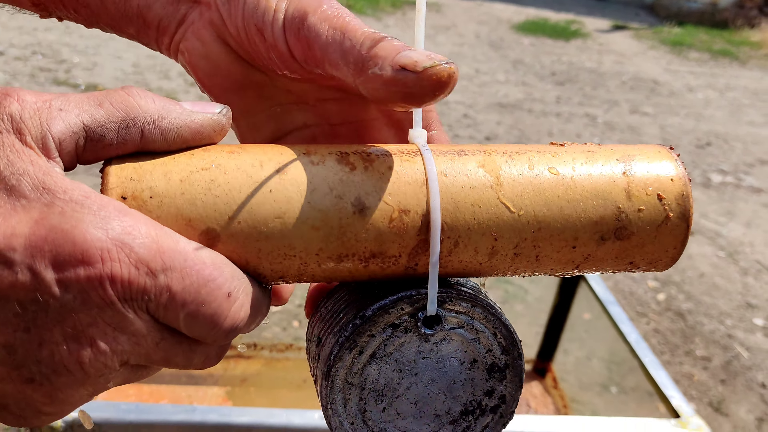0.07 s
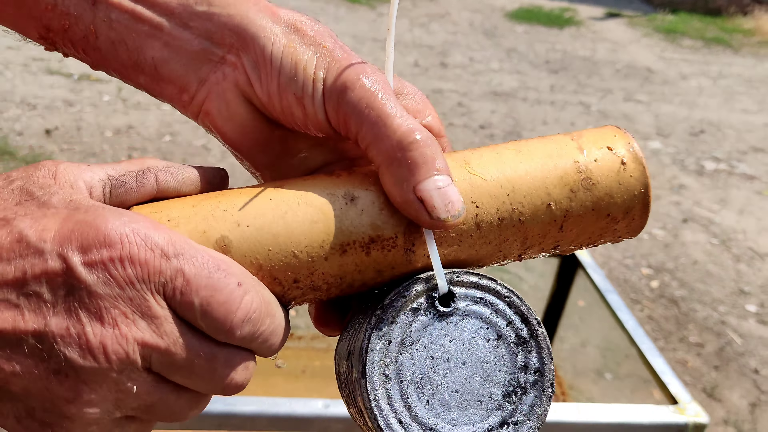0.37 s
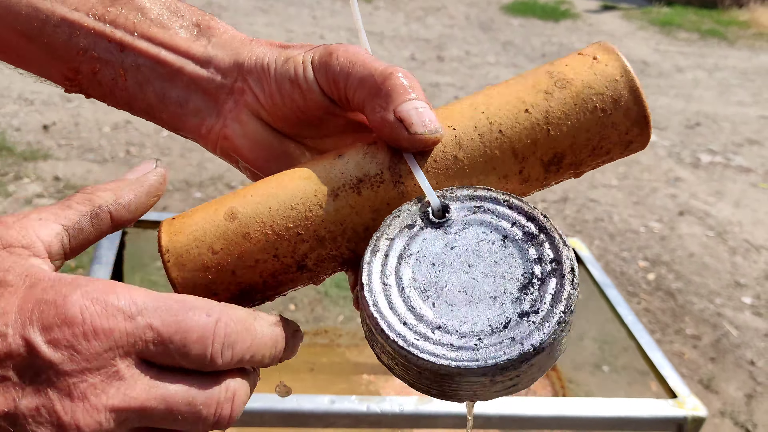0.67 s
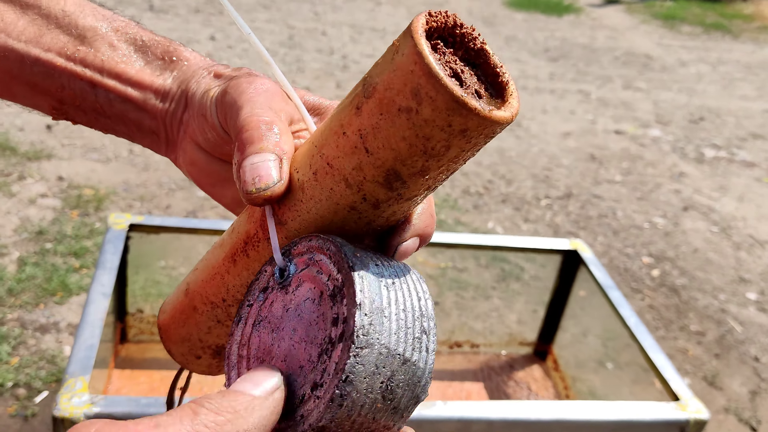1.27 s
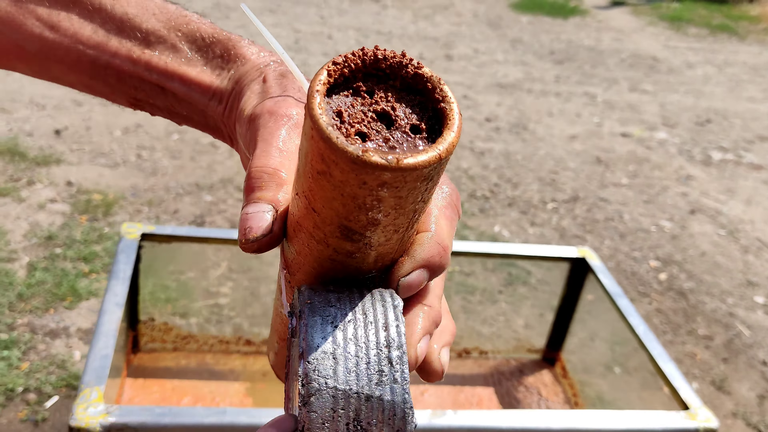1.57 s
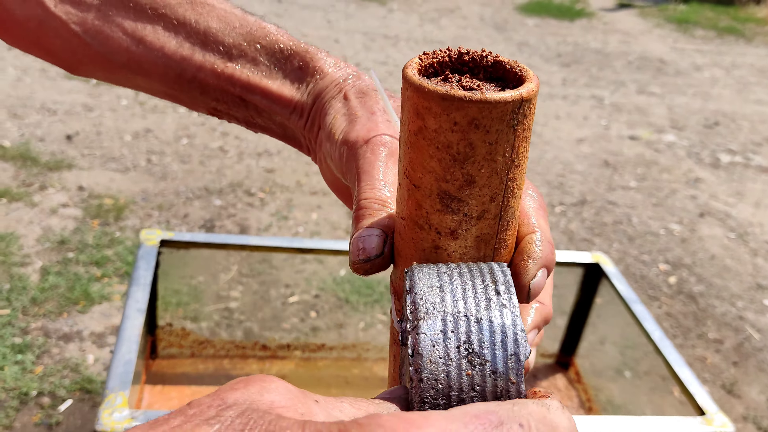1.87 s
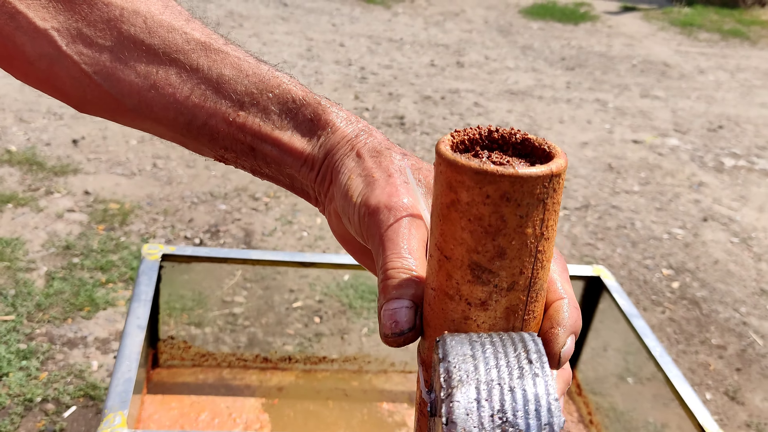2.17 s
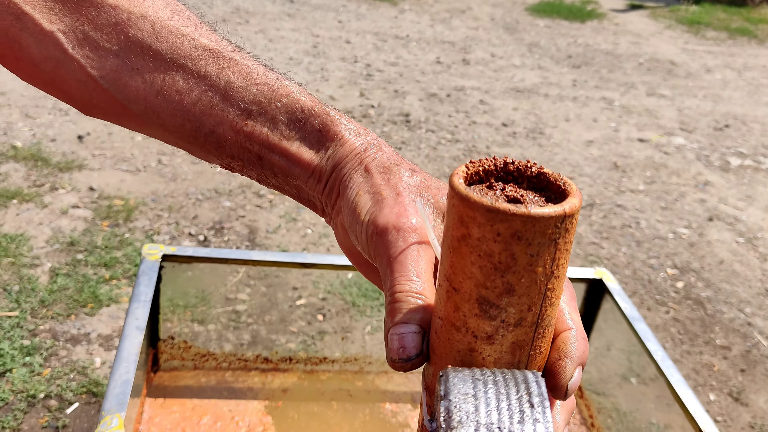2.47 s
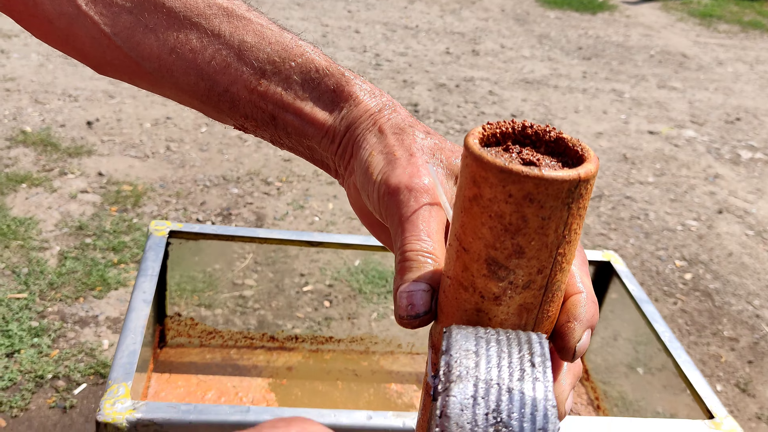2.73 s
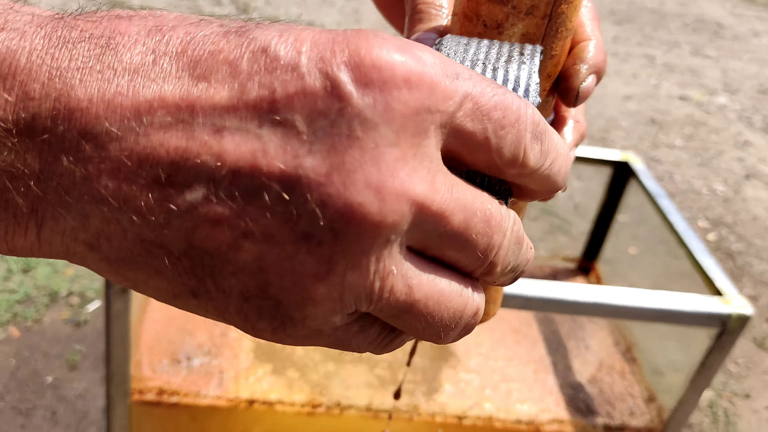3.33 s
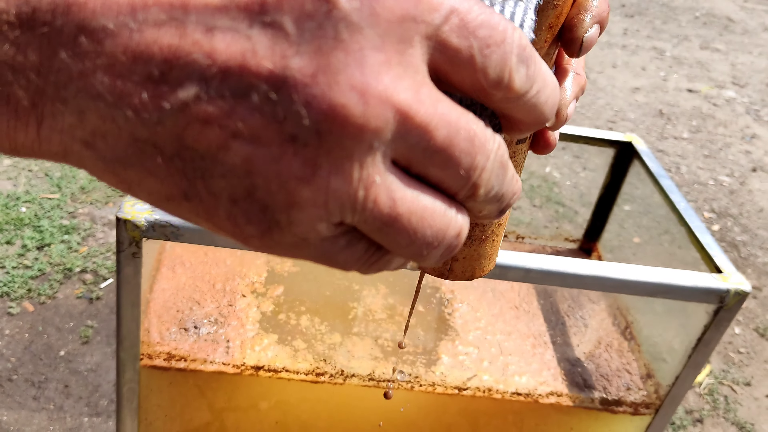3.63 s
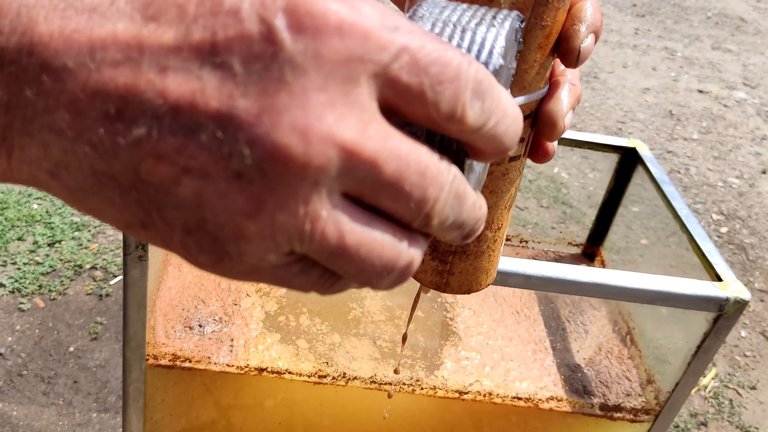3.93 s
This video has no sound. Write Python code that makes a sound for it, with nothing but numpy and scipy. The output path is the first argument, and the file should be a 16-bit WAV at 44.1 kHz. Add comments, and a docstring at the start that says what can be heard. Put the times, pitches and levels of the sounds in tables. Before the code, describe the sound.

Wind rumbles and pops on a close microphone outdoors, with one brief roaring gust. From then on, wet hands turn a cardboard tube strapped to a tin can, making small sharp ticks, short scrapes and faint gritty crackle.

```python
"""Outdoors in a breeze, close to a two-port microphone: wet hands turn a cardboard tube with a tin can
strapped to it. Grit and strap tick against tube and can, short slips stir the cardboard, and wet grit
crackles under the fingers. Wind rumbles and pops on both ports; one gust roars and howls across the
left one, and later something brushes past that side. Behind it all: open-air hiss and one far chirp."""
import sys
import numpy as np
from scipy import signal
from scipy.fft import rfft, irfft
from scipy.io import wavfile

SR = 44100
rng = np.random.default_rng(int(sys.argv[2]) if len(sys.argv) > 2 else 0)


def master_out(mix):
    """Clip the mix to full scale and print it as 16-bit PCM to the path in sys.argv[1]."""
    frames = np.transpose(np.atleast_2d(mix))
    ceiling = np.clip(frames, -1, 1)
    pcm = np.round(ceiling * 32767).astype(np.int16)
    wavfile.write(sys.argv[1], SR, pcm)


N = 176400
T = np.arange(N) / SR
FRAME_S = np.arange(N // 128 + 9) * 128 / SR  # coarse clock for the wind's movement
PORTS = ("left", "right")
TREBLE_LIMIT_HZ, FLUTTER_HZ = 14500, 35.3
WIND_REF_DB, OCTAVES_PER_DB = [-36, -34], 0.0651  # wind brightens as it rises past each port's reference

# Wind pressure at each port: time_s, level_db
PRESSURE_LEFT = [(0.0, -51.5), (0.148, -44), (0.41, -48), (0.53, -47), (0.8, -37.5), (0.98, -44.5),
                 (1.2, -37), (1.44, -40), (1.65, -49), (1.78, -42.5), (2.1, -59), (2.33, -41.5),
                 (2.52, -52), (2.69, -46.5), (2.9, -53.5), (2.981, -47.5), (3.09, -59.5), (3.14, -51.5),
                 (3.23, -66.5), (3.42, -64), (3.53, -71), (3.59, -57), (3.73, -46.5), (3.99, -47.5)]
PRESSURE_RIGHT = [(0.0, -35), (0.11, -42), (0.45, -36.5), (0.54, -43), (0.91, -33.5), (1.03, -40),
                  (1.23, -39), (1.34, -46), (1.45, -38), (1.78, -38.5), (1.88, -40.5), (2.06, -47.5),
                  (2.25, -41.5), (2.5, -50.5), (2.551, -40.5), (2.69, -45), (2.75, -39.5), (2.94, -53.5),
                  (3.09, -67), (3.27, -59.5), (3.35, -44.5), (3.43, -57), (3.48, -45), (3.99, -40.5)]


def amp(db):
    """Decibels to gain."""
    return 10 ** (np.asarray(db) / 20)


def unit(x):
    """Scales to rms 1."""
    return x / np.sqrt(np.mean(x ** 2) + 1e-20)


def curve(table, t, column=1):
    """One column of a table over time."""
    table = np.array(table)
    return np.interp(t, table[:, 0], table[:, column])


def passing_gain(table, column=1):
    """Gain of a passing sound, silent outside its table."""
    return amp(curve(table, T, column)) * (T > table[0][0]) * (T < table[-1][0])


def spectrum(table, hz):
    """Gain of a colour table at each frequency."""
    table_hz, db = np.transpose(table)
    return amp(np.interp(np.log(hz + 1), np.log(table_hz + 1), db))


def sides(left_over_right_db):
    """Left and right gains."""
    return amp(np.array([[left_over_right_db], [-left_over_right_db]]) / 2)


def add(mix, start_s, sound):
    """Mixes a sound in at a time."""
    part = mix[round(start_s * SR):][:len(sound)]
    part += sound[:len(part)]


def ring(x, colour):
    """Rings a signal through a minimum-phase filter of unit energy."""
    log_gain = np.log(spectrum(colour, abs(np.fft.fftfreq(2048, 1 / SR))))
    response = np.fft.ifft(np.exp(np.conj(signal.hilbert(log_gain)))).real[:1024]
    return signal.oaconvolve(x, response / np.linalg.norm(response))[:N]


def noise(colour):
    """Steady coloured noise of rms 1."""
    return unit(irfft(rfft(rng.standard_normal(N)) * spectrum(colour, np.fft.rfftfreq(N, 1 / SR)), N))


def wander(hz):
    """Random drift of rms 1, up to about the given rate."""
    return unit(irfft(rfft(rng.standard_normal(N)) / (1 + (np.fft.rfftfreq(N, 1 / SR) / hz) ** 4), N))


def whistle(hz, width_hz):
    """A fuzzy tone of rms 1 that follows a pitch."""
    carrier = np.exp(2j * np.pi * np.cumsum(hz * np.ones(N)) / SR)
    blur = wander(width_hz / 2) + 1j * wander(width_hz / 2)
    return unit((carrier * blur).real)


def turbulence(shape):
    """Noise in half-octave bands whose gains follow shape(hz) over time; rms about 1."""
    hz, white = np.fft.rfftfreq(N, 1 / SR), rfft(rng.standard_normal(N))
    out, power = np.zeros(N), 1e-20
    for centre in 16 * 2 ** (np.arange(17) / 2):
        half_octaves = np.clip(2 * np.log2((hz + 1e-3) / centre), -1, 1)
        band = irfft(white * np.cos(np.pi / 2 * half_octaves), N)
        gain = shape(centre)
        out += band * np.interp(T, FRAME_S, gain)
        power = power + gain ** 2 * centre * np.log(2) / SR
    return out / np.interp(T, FRAME_S, np.sqrt(power))


def open_air():
    """The faint outdoor hiss, different at each port."""
    # Colour of the hiss: frequency_hz, gain_db
    colour = [(60,9),(300,-1),(1000,-6),(2800,-9),(3900,-5),(5200,-8.5),(7000,-6),(8700,0),(10500,-4),(12200,-14),(14500,-17.5)]
    # Its slow drift: time_s, level_db
    loudness = [(0,-66),(.9,-67),(2,-67),(3.2,-67.5),(3.55,-69.5),(4,-68.5)]
    return np.array([noise(colour), noise(colour)]) * amp(curve(loudness, T))


def far_chirp():
    """A far-off chirp, perhaps a bird, blurred by distance."""
    # The call: centre_s, width_s, pitch_hz, level_db
    calls = [(.79,.07,3700,-76)]
    out = np.zeros((2, N))
    for centre_s, width_s, hz, db in calls:
        tone = np.array([whistle(hz, width_hz=600) for _ in PORTS])
        out += tone * amp(db) * np.exp(-.5 * ((T - centre_s) / width_s) ** 2)
    return out


def brush():
    """Something brushes close past the left port and barely reaches the right."""
    # Colour of the brushing: frequency_hz, gain_db
    colour = [(150,-17),(700,-9.5),(1700,-13),(3600,-7),(5600,-10.5),(8000,-4),(10200,0),(12000,-8),(14500,-17)]
    # Its swell at the left port: time_s, level_db
    swell = [(2.86,-71),(2.92,-60),(2.98,-52),(3.03,-53.5),(3.08,-53.5),(3.13,-47.5),(3.155,-52.5),(3.175,-67)]
    return np.array([noise(colour), amp(-28) * noise(colour)]) * passing_gain(swell)


def wind_rumble(port, pressure):
    """The breeze buffets one port: a lumpy rumble that brightens as it swells."""
    # Wind colour at each port's reference level: frequency_hz, gain_db
    colour_left = [(10,-8),(30,-4),(90,-2),(180,-5),(330,-12),(500,-24),(800,-44),(1500,-68),(4000,-95)]
    colour_right = [(10,1),(30,1.5),(90,-1),(180,-6),(300,-19.5),(500,-33),(800,-48.5),(1500,-76),(4000,-93)]
    # Single shoves of air, each lifting level and brightness: centre_s, strength, width_s, port
    buffets = [(.128,5,.008,"left"),(.43,3,.012,"left"),(.612,2,.012,"left"),(.718,2.5,.012,"left"),(1.853,7,.008,"left"),(2.701,13,.016,"left"),(2.822,13,.02,"left"),(2.955,13,.016,"left"),
               (.26,4,.03,"right"),(.38,4,.01,"right"),(.959,9,.012,"right"),(1.145,8,.0086,"right"),(1.215,10,.012,"right"),(1.54,4.5,.035,"right"),(1.71,4.5,.02,"right"),(1.915,7,.01,"right"),
               (2.22,4,.02,"right"),(2.625,7,.01,"right"),(2.765,5.5,.014,"right"),(3.51,7,.018,"right")]
    colour = (colour_left, colour_right)[port]
    flutter = np.interp(FRAME_S, T, wander(FLUTTER_HZ))
    push = sum(strength * np.exp(-.5 * ((FRAME_S - centre_s) / width_s) ** 2)
               for centre_s, strength, width_s, side in buffets if side == PORTS[port])
    db = curve(pressure, FRAME_S)
    octaves = OCTAVES_PER_DB * (db - WIND_REF_DB[port]) + 0.1 * push + 0.21 * flutter
    shift = np.minimum(2 ** octaves, 1.7)
    trim_db, flutter_db = (-4.5, -4)[port], 3
    gain = amp(db + trim_db + 0.42 * push + flutter_db * flutter)
    return turbulence(lambda hz: spectrum(colour, hz / shift)) * np.interp(T, FRAME_S, gain)


def eddy(centre_s, width_s):
    """One pointed pressure bump with shallow dips on both sides."""
    u = (T - centre_s) / width_s
    return (1 - u ** 2) / (1 + u ** 2) ** 2


def eddy_pops(port, pressure):
    """Eddies pop on one port: a few strong, and small random ones that grow and sharpen with the wind."""
    # The strong eddies: centre_s, peak_db, width_s, port
    strong = [(.026,-28,0.0015,"right"),(0.128,-30.5,0.0019,"left"),(.444,-28,0.0021,"right"),(.718,-27,0.0014,"left"),(.803,-28,0.0015,"right"),(.9,-23.5,0.0022,"right"),
              (.95,-25,0.00087,"right"),(.965,-27.5,0.00083,"right"),(1.144,-21.5,0.0013,"right"),(1.219,-31,0.0018,"right"),(1.539,-40,0.00066,"right"),(1.922,-25.5,0.0013,"right"),
              (2.561,-27.5,0.0053,"right"),(2.625,-28,.0016,"right"),(2.699,-28.5,0.0012,"left"),(3.489,-32.5,.0016,"right"),(3.512,-36.5,0.0011,"right"),(3.516,-31.5,0.0014,"right")]
    eddies_per_s, typical_width_s = 22, .0017
    out = sum(amp(db) * eddy(centre_s, width_s)
              for centre_s, db, width_s, side in strong if side == PORTS[port])
    for when, size, spread in rng.random((round(eddies_per_s * N / SR), 3)):
        centre_s = when * N / SR
        db = curve(pressure, centre_s)
        width_s = typical_width_s * 2 ** (spread - .5 - OCTAVES_PER_DB * (db - WIND_REF_DB[port]))
        out += 2 * size * amp(db - 1) * eddy(centre_s, width_s)
    return out


def gust():
    """A roar that opens up with the air speed and narrows to a wavering howl; a lower howl comes later."""
    # The gust across the left port: time_s, level_db, corner_hz
    rush = [(.93,-72,450),(1.0,-50.5,596),(1.05,-43,570),(1.14,-43,557),(1.195,-33.5,735),(1.215,-37,730),(1.24,-37,880),(1.27,-37,720),(1.29,-52.5,503),(1.42,-48.5,540),(1.49,-56,375),(1.54,-43.5,510),(1.58,-54,464),(1.61,-100,407)]
    # Hollow howls of that port, one list each: time_s, pitch_hz, level_db
    howl_paths = [
        [(1.2,620,-65),(1.26,660,-41),(1.30,690,-47.5),(1.345,720,-43.5),(1.385,610,-45),(1.42,680,-47),(1.49,520,-68),(1.515,440,-49),(1.55,540,-49),(1.6,480,-76)],
        [(2.24,300,-79),(2.33,330,-64.5),(2.40,360,-63.5),(2.44,350,-48.5),(2.49,300,-76)],
    ]
    low_cut_hz, corner_hz = 209, curve(rush, FRAME_S, column=2)
    roar = turbulence(lambda hz: hz / np.hypot(hz, low_cut_hz) / np.hypot(1, (hz / corner_hz) ** 3.62))
    howls = sum(whistle(curve(path, T), width_hz=130) * passing_gain(path, column=2)
                for path in howl_paths)
    flutter = amp(2 * wander(FLUTTER_HZ))
    return roar * passing_gain(rush) * flutter + howls


def reflections(dry):
    """Adds quick scatter from hands, can and ground, and a faint open-air tail."""
    scatter, open_tail = (0.012, -6), (0.17, -9)  # t60_s, level_db
    t, out = T[:SR // 3], dry.copy()
    for t60_s, db in (scatter, open_tail):
        tail = rng.standard_normal((2, len(t))) * np.exp(-np.log(1000) * t / t60_s) * (t > .001)
        out += amp(db) * signal.fftconvolve(dry, tail / np.linalg.norm(tail[0]), axes=1)[:, :N]
    return out


def grit_crackle():
    """Tiny random grains of wet grit under the fingers, each size with its own brief ring."""
    # Crackle as the fingers work: time_s, level_db
    loudness = [(0,-90),(1.1,-80),(1.2,-67),(1.35,-65),(1.5,-68),(1.65,-62),(1.8,-70),(2.05,-72),(2.2,-66.5),(2.85,-65.5),(3.2,-78),(3.45,-73),(3.7,-76),(4,-78)]
    centre_hz, spread_octaves, decay_cycles, grains_per_s = 9000, .35, 2.2, 260
    out, t = np.zeros((2, N)), T[:256]
    for deviation in np.linspace(-2, 2, num=24):
        hz = min(centre_hz * 2 ** (spread_octaves * deviation), TREBLE_LIMIT_HZ)
        rate = grains_per_s * np.exp(-deviation ** 2 / 2) / 14  # this size's share of the grains
        strength = amp(3 * np.minimum(rng.exponential(1, N), 3))
        hits = strength * (rng.random(N) < rate / SR)
        for port in range(2):
            grain = np.sin(2 * np.pi * (hz * t + rng.random())) * np.exp(-hz * t / decay_cycles)
            out[port] += signal.oaconvolve(hits, grain)[:N]
    clumps = amp(2.5 * wander(hz=22))
    return sides(-3) * unit(out * clumps) * amp(curve(loudness, T))


def slips():
    """Short slips, each a dying burst of duller grains that also stirs the cardboard."""
    # The slips: start_s, level_db, decay_s, cardboard_db
    bursts = [(1.447,-43.5,0.0043,-39),(1.599,-49,0.012,-32),(1.69,-63,0.0011,-12),(1.762,-42.5,0.0024,-22),(1.866,-52,0.015,4.5),(1.942,-53,0.0082,1),(2.147,-50.5,0.015,11),(2.177,-46.5,0.012,3.5),(2.697,-49,0.0036,-3),(2.764,-53,0.013,-23),(2.816,-47.5,0.0046,5),(3.297,-46,0.0023,-17),(3.568,-42,0.0033,-7)]
    # Colour of the grains and of the cardboard ring under them: frequency_hz, gain_db
    grain_colour = [(300,-26),(1500,-26.5),(3000,-9),(4200,1),(7000,-1.5),(8600,5.5),(10500,-6.5),(14500,-11)]
    cardboard_colour = [(300,2),(1200,-18),(1900,-4.5),(3200,9.5),(4500,-2.5),(8000,-24),(15000,-30)]
    grains_per_s = 2600
    streams = rng.standard_normal((3, N)) * (rng.random(N) < grains_per_s / SR)
    grains = unit(streams[:2] + streams[2])  # one stream for each port, one heard by both
    grain_gain, cardboard_gain = np.zeros(N), np.zeros(N)
    for start_s, db, decay_s, cardboard_db in bursts:
        fade = amp(db - 2.5) * np.exp(-T[:SR // 8] / decay_s)
        add(grain_gain, start_s, fade)
        add(cardboard_gain, start_s, fade * amp(cardboard_db - 11))
    scrape = np.array([ring(side * grain_gain, grain_colour) for side in grains])
    cardboard = np.array([ring(side * cardboard_gain, cardboard_colour) for side in grains])
    return sides(-2.5) * (scrape + cardboard)


def ticks():
    """Grit and strap tick on tube and can: a snap under a millisecond long, then a weaker rebound."""
    # The ticks: start_s, level_db, left_over_right_db
    contacts = [(0.7716, -41, 8), (1.3226, -38, -6), (1.3376, -34.5, 1), (1.3585, -38, -2),
                (1.4467, -26.5, -1), (1.4752, -35.5, -3), (1.5415, -39, -8), (1.5783, -39, -6),
                (1.5993, -41, -11), (1.6194, -40, -6.5), (1.6415, -38, -7.0), (1.6512, -37, -8),
                (1.669, -36, -5), (1.6885, -30.5, -10), (1.761, -32.5, -12), (1.8669, -33, -3),
                (1.8845, -33.5, 5), (1.9806, -39.5, -2.0), (2.1378, -22.5, -6.5), (2.149, -29.5, -6.0),
                (2.1768, -31, -2), (2.3023, -30.5, -7), (2.4114, -37.5, -9), (2.4264, -41, -5.0),
                (2.4858, -28, -10.5), (2.5159, -35, -4), (2.577, -22, -5), (2.5935, -38, -3.0),
                (2.6965, -34, -14), (2.7548, -24.5, -6), (2.7643, -21.5, -7), (2.7794, -38, -6),
                (2.816, -34, -2), (2.8838, -43, 5), (3.1896, -46, -10), (3.2958, -36.5, -2),
                (3.3772, -43, -16), (3.4372, -41, -12), (3.4511, -41, -12.5), (3.588, -44, -11),
                (3.692, -41, -7), (3.7285, -45, -13), (3.7844, -44, -8)]
    # Colour of a tick at each port: frequency_hz, gain_db
    colour_left = [(300,-35),(1500,-22),(3200,-18.5),(5000,-15),(6600,-14.5),(8500,-10),(10200,2.5),(12000,-8),(15000,-16.5)]
    colour_right = [(300,-68),(1500,-48),(3200,-28.5),(5000,-33),(6600,-15.5),(7500,-14),(8600,-1),(9600,-11),(12000,-26.5),(15000,-25.5)]
    delay_s, left_lag_s, decay_s = .0016, .0001, .0005
    typical_gap_s, rebound_db = .0014, -7
    out, t = np.zeros((2, N)), T[:200]
    fade = np.exp(-t / decay_s)
    for start_s, db, pan_db in contacts:
        snap_noise, rebound_noise, jitter = rng.standard_normal((3, len(t)))
        snap = (t == 0) + .2 * snap_noise * fade
        snap /= np.linalg.norm(snap)
        rebound = rebound_noise * fade
        rebound *= amp(rebound_db) / np.linalg.norm(rebound)
        gap_s = typical_gap_s * np.exp(0.41 * jitter[0])
        for port, gain in enumerate(amp(db + 5.5) * sides(pan_db)):
            arrival_s = start_s + delay_s + left_lag_s * (1 - port)
            add(out[port], arrival_s, gain * snap)
            add(out[port], arrival_s + gap_s, gain * rebound)
    return np.array([ring(out[0], colour_left), ring(out[1], colour_right)])


def scene():
    """Close handling and wind on the microphone, over the outdoor background."""
    wind_left = wind_rumble(0, PRESSURE_LEFT) + eddy_pops(0, PRESSURE_LEFT) + gust()
    wind_right = wind_rumble(1, PRESSURE_RIGHT) + eddy_pops(1, PRESSURE_RIGHT)
    handling = reflections(ticks() + slips() + grit_crackle())
    return handling + np.array([wind_left, wind_right]) + open_air() + brush() + far_chirp()


def record(dry):
    """The recorder's band limit cuts the highest treble."""
    lowpass = signal.firwin(161, TREBLE_LIMIT_HZ, window=("kaiser", 8), fs=SR)
    return signal.oaconvolve(dry, lowpass[None], "same")


dry = scene()
out = record(dry)
master_out(out)
```